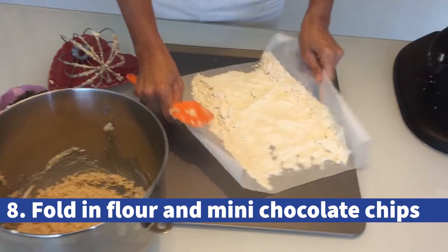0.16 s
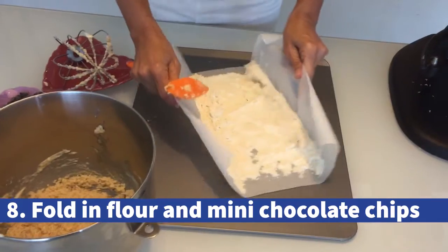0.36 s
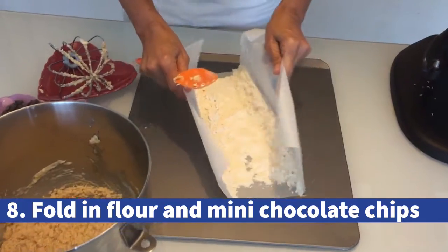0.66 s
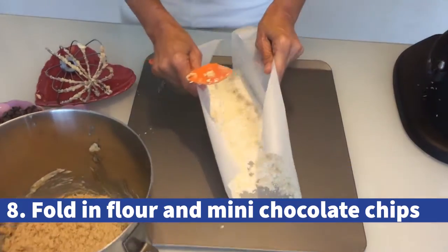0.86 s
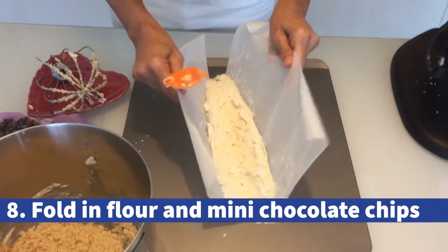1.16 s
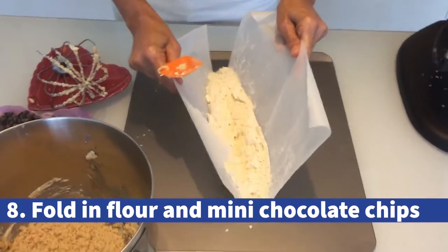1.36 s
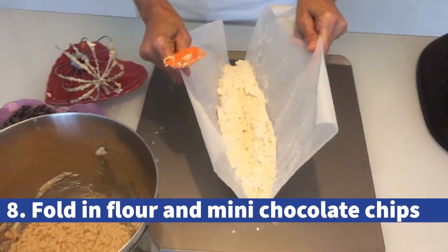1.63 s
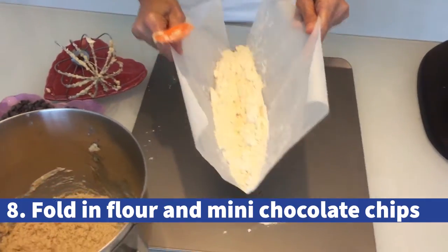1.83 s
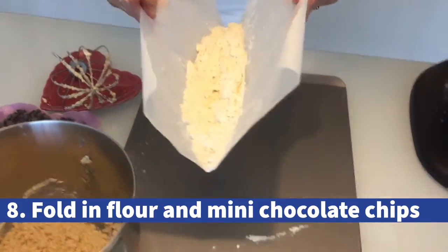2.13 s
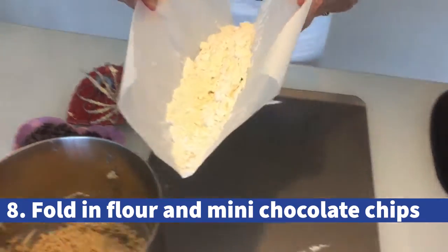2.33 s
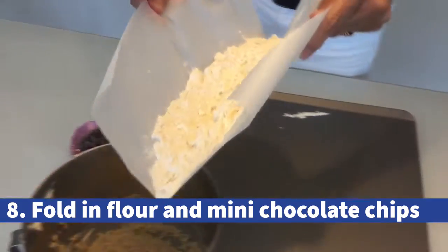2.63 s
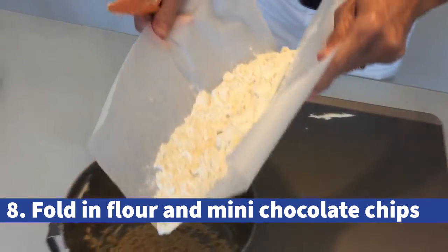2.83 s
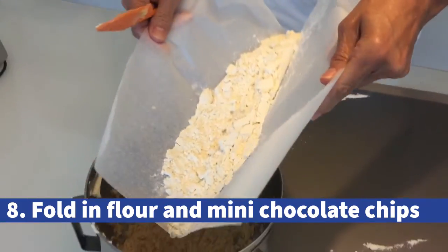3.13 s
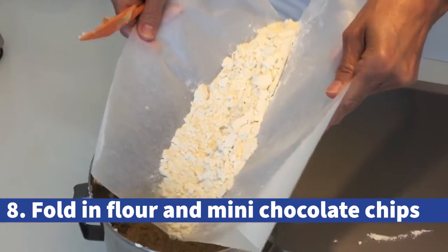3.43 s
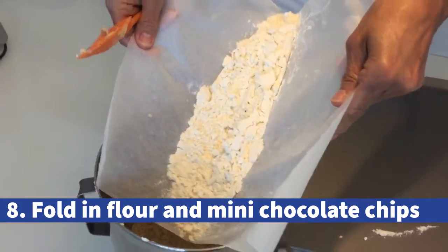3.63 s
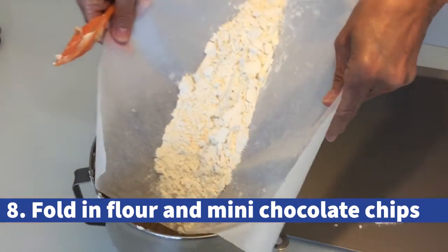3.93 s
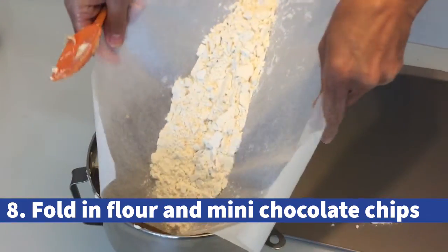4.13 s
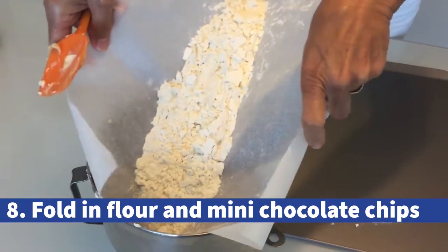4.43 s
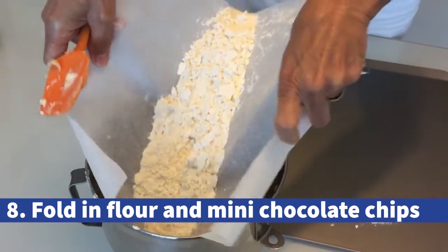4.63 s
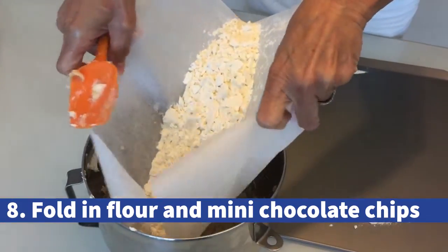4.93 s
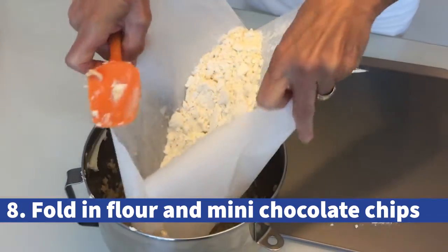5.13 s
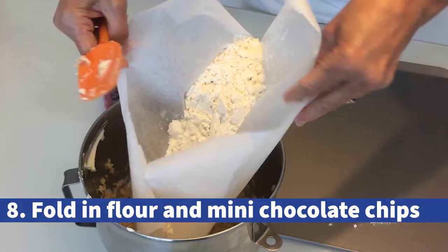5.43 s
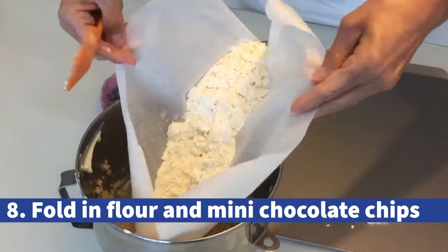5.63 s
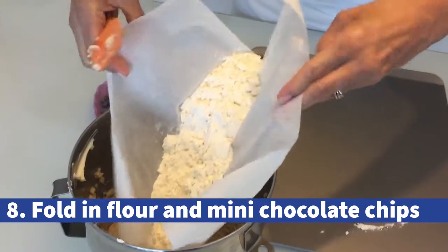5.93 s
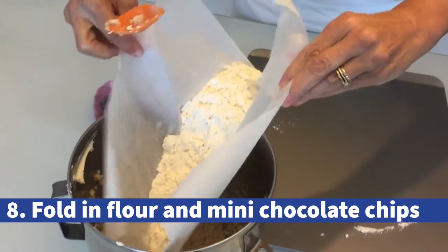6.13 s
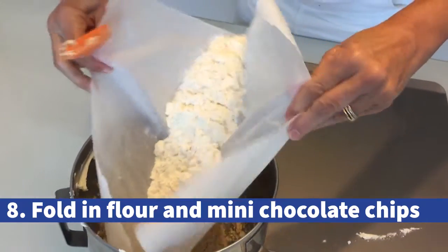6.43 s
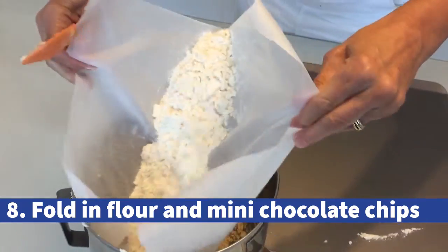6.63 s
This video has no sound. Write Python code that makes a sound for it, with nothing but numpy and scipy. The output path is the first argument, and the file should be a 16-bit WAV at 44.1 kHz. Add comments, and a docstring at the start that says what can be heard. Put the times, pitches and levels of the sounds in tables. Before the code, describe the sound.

Stiff parchment paper rustles, quiets to scattered ticks, then crackles harder in bright snapping bursts above a metal bowl in a softly humming kitchen.

```python
"""A sheet of baking parchment loaded with flour is dragged over a tray, in crackle and sliding hiss from noise
pops. It is lifted and tilted while its rustle crests again and again; creases snap singly and in runs, panels
flutter and folds collapse. As it comes over a steel mixing bowl, decaying air and wall modes colour the paper,
and it is folded into a chute. Throughout, a small kitchen answers with decaying noise, and an appliance hums in
wavering sines over still air."""
import sys
import numpy as np
from scipy import signal
from scipy.fft import rfft, irfft, next_fast_len
from scipy.io import wavfile
from scipy.ndimage import uniform_filter1d, map_coordinates

SR = 44100
rng = np.random.default_rng(int(sys.argv[2]) if len(sys.argv) > 2 else 0)


def to_wav(s):
    """Save 16-bit WAV."""
    ch = np.atleast_2d(s).T  # columns
    pcm = np.round(np.clip(ch, -1, 1) * 32767)  # PCM
    wavfile.write(sys.argv[1], SR, pcm.astype(np.int16))


N = 298689

# how the paper moves: (time [s], share of smooth sliding against crackle [0-1])
SLIDING_SHARE = [(.3, 0.7), (.6, 0.3), (2.8, 0.68), (3.4, .1), (4.1, .1), (5.5, .76), (5.8, 0.32),
                 (6.3, 0.35), (6.5, 0.66), (6.77, 0)]


def amp(db):
    """Decibels to gain."""
    return 10 ** (np.asarray(db) / 20)


def unit(x):
    """Scale to rms 1."""
    return x / np.sqrt(np.mean(x ** 2) + 1e-20)


def fade(t, t60):
    """Exponential decay by 60 dB in t60 seconds."""
    return 1000 ** (-t / t60)


def along(points, hz):
    """Read (frequency, value) points on a log frequency axis."""
    f, values = np.transpose(points)
    return np.interp(np.log(hz + 1), np.log(f), values)


def curves(rows):
    """One value per sample for each column after the time."""
    times, *columns = np.transpose(rows)
    return [np.interp(np.arange(N) / SR, times, column) for column in columns]


def wobble(rate):
    """A smooth random curve with rate knots a second."""
    knots = rng.standard_normal(int(N * rate / SR) + 4)
    return map_coordinates(knots, [np.arange(N) * rate / SR])


def filtered(x, response):
    """Multiply the spectrum of x by a response of frequency."""
    size = next_fast_len(N + SR // 2)
    hz = np.fft.rfftfreq(size, 1 / SR)
    return irfft(rfft(x, size) * response(hz), size)[:N]


def coloured(x, spectrum, size=4096):
    """Causal filter with the given spectrum that keeps the power of white noise."""
    gain = unit(amp(along(spectrum, np.fft.rfftfreq(size, 1 / SR))))
    # folding the cepstrum forward makes the filter minimum phase
    cepstrum = irfft(np.log(gain + 1e-6))
    cepstrum[1:size // 2] *= 2
    cepstrum[size // 2 + 1:] = 0
    impulse = irfft(np.exp(rfft(cepstrum)))
    return signal.fftconvolve(x, impulse)[:N]


def shifting(x, response, size=6000):
    """Convolve with a response drawn anew every half window, as the sheet moves."""
    out, x = np.zeros(N + 2 * SR), np.pad(x, size // 2)
    window = np.sin(np.pi * np.arange(size) / size)
    for start in range(0, N, size // 2):
        piece = x[start:start + size]
        answer = signal.fftconvolve(piece * window[:len(piece)], response())
        out[start:][:len(answer)] += answer
    return out[size // 2:][:N]


def facet(t60, tilt_db, uneven_db, rise_s, crack=0.56, size=1024, count=24):
    """One facet of paper popping through: a sharp crack and a dying shiver, of energy 1 and its own colour."""
    t, hz = np.arange(size) / SR, np.fft.rfftfreq(size, 1 / SR)
    shiver = rng.standard_normal(size) * fade(t, t60) * (1 - np.exp(-(t / rise_s) ** 2))
    burst = shiver / np.linalg.norm(shiver)
    burst[size // 32] += crack * rng.choice([-1, 1])
    bump_places = np.linspace(0, np.sqrt(SR / 2), count)
    bumps = np.interp(np.sqrt(hz), bump_places, rng.standard_normal(count))
    octaves = np.log2(np.maximum(hz, 2000) / 2000)  # the tilt starts at 2 kHz
    pop = irfft(rfft(burst) * amp(uneven_db * bumps + tilt_db * octaves))
    return pop / np.linalg.norm(pop)


def crackle(rate, spread_db, t60, even_s, count=80):
    """Many small facets, rate a second, popping at random; slow swings are evened out and the rms is 1."""
    pops = np.zeros(N + SR)
    for _ in range(count):
        pop_t60 = t60 * np.exp(0.39 * rng.normal())
        pop = facet(pop_t60, rng.normal(0, 0.97), uneven_db=3, rise_s=0.00023)
        starts = rng.integers(0, N, int(rate * N / SR / count))
        sizes = amp(spread_db * np.clip(rng.standard_normal(len(starts)), -2, 2))
        places = (starts[:, None] + np.arange(len(pop))).ravel()
        pops += np.bincount(places, np.outer(sizes, pop).ravel(), N + SR)
    span = int(even_s * SR)
    power = np.abs(uniform_filter1d(uniform_filter1d(pops[:N] ** 2, span), span))
    return unit(pops[:N] / np.sqrt(power + 0.1 * power.mean()))


def background():
    """A hum of sines wavering in level and phase, over the filtered noise of still air."""
    # appliance hum: (frequency [Hz], rms level [dB], waver [dB])
    hum_tones = [(120, -65.5, 1), (134.7, -59, 4), (247.3, -66.5, 3), (45, -75.5, -7)]
    # still room: (frequency [Hz], relative level per Hz [dB])
    air_spectrum = [(20, -5), (40, -7), (65, -3), (100, 3.5), (160, 5.5), (200, -2.5), (300, -0.5),
                    (450, -12), (850, -9), (1300, -18), (2000, -22.5), (3000, -30.5), (6000, -37),
                    (16000, -47)]
    t = np.arange(N) / SR
    hum = np.zeros(N)
    for hz, db, waver_db in hum_tones:
        waver = amp(waver_db * wobble(14))
        tone = np.sin(2 * np.pi * hz * t + .5 * wobble(10))
        hum += amp(db) * unit(waver * tone)
    return hum + amp(-58.0) * coloured(rng.standard_normal(N), air_spectrum)


def movements():
    """Rustle level and weight in dB over time, for each long movement and each crest of the rustle."""
    # weight is the low flexing against the rustle
    # the loaded sheet is dragged over the tray: (time [s], rustle level [dB], weight [dB])
    drag = [(0, -39, -24), (0.11, -34, -20.5), (0.22, -35.5, -19), (0.3, -33, -16.5), (0.44, -39.5, -23.5),
            (0.6, -42.5, -21), (0.76, -36.5, -20), (0.83, -42, -29), (1.12, -40.5, -21), (1.2, -35, -29),
            (1.33, -31, -23.5), (1.43, -44.5, -19), (1.52, -68, -18)]
    # separate crests of the rustle while the sheet is lifted and tilted: # (crest time [s], rise [s], fall [s],
    # rustle level [dB], weight [dB])
    crests = [(1.655, 0.12, 0.054, -52, -14), (1.99, 0.022, 0.042, -50, -9.5),
              (2.08, 0.032, .025, -47, -6.5), (2.38, .05, .04, -52.5, -10), (2.785, 0.025, .03, -54, -15),
              (2.996, 0.045, 0.053, -36, -12.5), (3.09, 0.034, 0.061, -46, -16),
              (3.24, 0.062, .04, -55, -14), (3.33, 0.029, 0.068, -39.5, -13),
              (3.396, 0.045, 0.045, -31.5, -13.5), (3.49, 0.023, 0.023, -36, -9),
              (3.66, .09, 0.076, -37, -16), (3.779, 0.042, 0.029, -32, -13), (3.95, .07, 0.056, -36, -15),
              (4.094, 0.085, .05, -37.5, -11.5), (4.2, .08, .06, -49, -25),
              (4.286, 0.024, .018, -30.5, -9.5), (4.461, 0.062, 0.08, -34.5, -22),
              (4.57, 0.036, 0.042, -35.5, -6.5), (4.73, 0.3, 0.11, -39, -16),
              (4.869, 0.027, 0.015, -40, -15)]
    # the sheet is folded into a chute over the bowl: (time [s], rustle level [dB], weight [dB])
    fold = [(4.921, -49.5, -14.5), (5.11, -42, -31), (5.2, -34, -16), (5.35, -30, -20), (5.42, -36.5, -19),
            (5.509, -30.5, -20.5), (5.619, -36.5, -20.5), (5.798, -26, -19), (5.88, -40.5, -17.5),
            (5.97, -27, -14.5), (6.029, -35, -27.5), (6.139, -33, -18.5), (6.209, -27, -21),
            (6.301, -30.5, -21), (6.492, -23.5, -24.5), (6.63, -35.5, -24.5), (6.7, -30, -25.5),
            (6.77, -37.5, -14)]
    release_db_per_s = 250  # how fast a long movement comes and goes
    crest_shape = 1.53  # 1 = pointed crest, 2 = round
    t = np.arange(N) / SR
    for rows in (drag, fold):
        db, weight_db = curves(rows)
        outside_s = np.abs(t - np.clip(t, rows[0][0], rows[-1][0]))
        yield db - release_db_per_s * outside_s, weight_db
    for s, rise, fall, db, weight_db in crests:
        away = np.clip(np.maximum((s - t) / rise, (t - s) / fall), 0, 10)
        yield db - 20 / np.log(10) * away ** crest_shape, weight_db


def handling():
    """The movements together: their powers add, and their weights average by power."""
    power, weighted = 1e-20, 0
    for db, weight_db in movements():
        part = np.exp(db * np.log(10) / 10)
        power = power + part
        weighted = weighted + part * weight_db
    return 10 * np.log10(power), weighted / power


def sheet(level_db, weight_db):
    """Bending makes crackle, sliding a finely grained hiss; the more weight, the larger the radiating patches."""
    # radiation of small, middling and large patches: (frequency [Hz], relative level per Hz [dB])
    crisp_spectrum = [(1200, -39.5), (1900, -4), (2400, 3.5), (4000, 3.5), (6300, 2), (9000, 2),
                      (12000, 1.5), (15800, -7.5)]
    rustle_spectrum = [(700, -36), (1050, -11.5), (1220, -3.5), (1500, 0), (1900, 2), (2300, -1.5),
                       (3200, -11), (6000, -50.5)]
    flex_spectrum = [(90, -35), (170, -14), (240, -7), (500, -3.5), (570, -1.5), (720, 2), (790, -1.5),
                     (900, -1.5), (1300, -13.5), (2500, -41.5)]
    crisp_db, rustle_db, flex_db = -0.91, -3, -1.5
    rustle_weight = 0.37  # share of the weight that the middling patches follow
    share = np.clip(curves(SLIDING_SHARE)[0], 0, 1)
    bending = crackle(rate=360, spread_db=6.5, t60=0.0089, even_s=0.089)
    sliding = crackle(rate=2000, spread_db=3.0, t60=0.0024, even_s=0.09)
    drive = amp(level_db) * (np.sqrt(1 - share) * bending + np.sqrt(share) * sliding)
    crisp = coloured(drive * amp(crisp_db), crisp_spectrum)
    rustle = coloured(drive * amp(rustle_db + rustle_weight * weight_db), rustle_spectrum)
    flex = coloured(drive * amp(flex_db + weight_db), flex_spectrum)
    return crisp + rustle + flex


def kitchen(x, wet_db, early_db, early_t60):
    """Counter and cupboards answer with a short noise burst while a longer diffuse tail dies away."""
    # decay of the room: (frequency [Hz], t60 [s])
    room_decay = [(200, 0.31), (1000, 0.37), (4000, 0.36), (9000, 0.2), (16000, 0.15)]
    t = np.arange(SR // 3) / SR

    def response():
        hz, s, z = signal.stft(rng.standard_normal(len(t)), SR, nperseg=256)
        decaying = z * fade(s, along(room_decay, hz)[:, None])
        tail = signal.istft(decaying, SR, nperseg=256)[1][:len(t)]
        tail = tail * (1 - np.exp(-t / 0.0029))  # soft onset
        early = rng.standard_normal(len(t)) * (t > .001) * fade(t, early_t60)
        wet = amp(wet_db) * tail / np.linalg.norm(tail)
        return wet + amp(early_db) * early / np.linalg.norm(early)
    return shifting(x, response)


def strays(level_db):
    """Rows (time, level, brightness) of lesser creases giving way at random, sized by the rustle around them."""
    per_s, gain_db, spread_db = 30, 14, 2.5
    held_db = -64  # rustle that sizes them while the sheet just hangs
    sliding_db = -4.5  # smooth sliding weakens them by this much
    count = int(per_s * (N / SR - .1))
    chance = rng.standard_normal((count, 3))
    times = (np.arange(count) + 1 + chance[:, 0] / 2) / per_s
    times = np.clip(times, .02, N / SR - .02)
    size_db = np.maximum(level_db, held_db) + gain_db + sliding_db * curves(SLIDING_SHARE)[0]
    pop_db = size_db[(times * SR).astype(int)] + spread_db * chance[:, 1]
    brightness_hz = 5000 * np.exp(.5 * chance[:, 2])
    return list(zip(times, pop_db, brightness_hz))


def chains(rows, count=4):
    """A faint snap leads each one in; it sets off neighbours along the crease, on average weaker and sparser."""
    gap_s, slowing, loss_db = .0026, 1.6, 7.5
    lead_s, lead_db = .007, -19
    out = []
    for s, db, hz in rows:
        out.append((s - lead_s * np.exp(.4 * rng.normal()), db + lead_db, hz))
        out.append((s, db, hz))
        for k, (late, loud) in enumerate(rng.standard_normal((count, 2))):
            s = s + gap_s * slowing ** k * np.exp(.3 * late)
            out.append((s, db - loss_db * (k + 1) + 2 * loud, hz))
    return out


def snaps(rows):
    """Each crease creaks briefly, then lets go in one sharp pop whose spectrum tilts with its brightness."""
    # radiation of a snap: (frequency [Hz], relative level per Hz [dB])
    snap_spectrum = [(100, -38.5), (400, -14), (800, -15), (1200, -5.5), (2500, 0.5), (4000, 4),
                     (6300, 2.5), (9000, 3), (12500, 2.5), (16000, -4.5)]
    gain_db, ring_t60, tilt_per_octave_db = 8.5, 0.012, 2.5  # octaves of brightness
    out, lead_in = np.zeros(N + SR), SR // 80
    for s, db, hz in rows:
        tilt_db = tilt_per_octave_db * np.log2(hz / 5200)
        pop = facet(ring_t60, tilt_db, uneven_db=3.0, rise_s=0.00068, crack=0.35)
        # the reversed decay swells up to the pop
        creak = rng.standard_normal(lead_in) * fade(np.arange(lead_in)[::-1] / SR, 0.038)
        start = round(s * SR)
        out[start:][:len(pop)] += amp(db + gain_db) * pop
        out[start - lead_in:start] += amp(db - 31) * creak
    return coloured(out[:N], snap_spectrum)


def hollow_swells(width=0.32):
    """A short hollow flutter of band noise swells and dies: mostly panels of the sheet flipping through, where
    a lower centre stands for a larger panel; the first is a short swell in the opening rustle."""
    # hollow swells, mostly larger panels buckling, the first a swell in the opening rustle: (time [s], half
    # length [s], centre [Hz], level before gain [dB])
    swell_rows = [(.13, 0.04, 1500, -45), (0.635, 0.0025, 2540, -30.5), (1.082, .026, 2140, -45.5),
                  (1.818, .018, 2940, -66), (2.361, 0.0099, 3380, -45), (2.995, 0.02, 613, -49),
                  (3.371, .025, 630, -48), (3.677, 0.032, 550, -55.5), (4.566, 0.015, 2160, -37.5),
                  (5.088, 0.015, 2750, -42), (5.178, 0.046, 667, -52), (5.367, 0.023, 312, -49.5),
                  (5.489, 0.025, 690, -43.5), (6.35, 0.028, 237, -50.5), (6.499, 0.054, 1040, -38)]
    out, t = np.zeros(N + 2 * SR), np.arange(-SR // 4, SR // 4) / SR
    f = np.fft.rfftfreq(len(t), 1 / SR) + 1
    for s, half_s, hz, db in swell_rows:
        swell = np.exp(-(t / half_s) ** 2)
        band = np.exp(-(np.log2(f / hz) / width) ** 2)
        flutter = swell * irfft(rfft(rng.standard_normal(len(t))) * band, len(t))
        flutter *= np.linalg.norm(swell) / np.linalg.norm(flutter)
        out[SR + round((s + t[0]) * SR):][:len(t)] += amp(db + 2.5) * flutter
    return out[SR:SR + N]


def bowl(paper):
    """The paper's noise rings the bowl's modes, whose strengths vary at random as the sheet moves."""
    # nearness of the sheet to the bowl: (time [s], coupling [dB])
    over_bowl = [(0, -33), (2.5, -4), (3.2, -1.5), (4.8, -5), (5.4, 7), (6.77, 7)]
    # air and wall modes: (frequency [Hz], t60 [s], level [dB])
    bowl_modes = [(604, 0.048, -8), (699.5, 0.086, -8.5), (977, 0.052, 3), (1024, 0.035, 1),
                  (1077, 0.042, 0.5), (1225, 0.33, -19), (2710, 0.41, -18)]
    t = np.arange(SR // 3) / SR
    rings = []
    for hz, t60, db in bowl_modes:
        evening = 2 * np.log(1000) / (t60 * SR)  # about unit gain at resonance
        rings.append(amp(db) * evening * fade(t, t60) * np.cos(2 * np.pi * hz * t))
    rings = np.array(rings)

    def answer():
        return amp(rng.normal(0, 2.5, len(rings))) @ rings
    return shifting(paper * amp(curves(over_bowl)[0]), answer)


def crunches():
    """A fold gives way in a dense run of tiny snaps that swells to a crest and dies."""
    # collapsing folds: (crest time [s], rise [s], fall [s], level before gain [dB])
    folds = [(3.890, .0009, 0.0023, -24), (3.8976, 0.00075, .0014, -10), (4.295, 0.018, 0.0029, -17),
             (4.561, 0.0086, .0047, -23), (5.338, 0.0064, 0.016, -24.5), (5.808, 0.0018, .0068, -18),
             (5.913, 0.0036, 0.0047, -18), (5.95, .0012, 0.0084, -16.5), (5.987, 0.0024, 0.0044, -23),
             (6.341, 0.0024, 0.0036, -18)]
    # radiation of a collapsing fold: (frequency [Hz], relative level per Hz [dB])
    collapse_spectrum = [(100, -38), (400, -13), (800, -14.5), (1200, -8), (2500, 0.5), (4000, 3.5),
                         (6300, 2.5), (9000, 2), (12500, 0.5), (16000, -3)]
    t = np.arange(N) / SR
    swell = np.zeros(N)
    for s, rise, fall, db in folds:
        swell += amp(db) * np.exp(-np.maximum((s - t) / rise, (t - s) / fall))
    tiny_snaps = crackle(rate=3500, spread_db=0, t60=0.0097, even_s=0.012)
    return coloured(swell * tiny_snaps, collapse_spectrum) * amp(-1.0)


def scene():
    """Paper, bowl and room, heard from one point."""
    # the most prominent creases snapping: (time [s], level before gain [dB], brightness [Hz])
    main_snaps = [(0.0837, -14, 4240), (0.2688, -13.5, 1910), (0.2984, -14.5, 9250), (0.6345, -13, 2460),
                  (0.6619, -13.5, 8770), (0.9016, -18.5, 6610), (1.1564, -22, 4180), (1.2039, -13.5, 3860),
                  (1.5643, -19.5, 9200), (1.6194, -18, 9940), (1.6519, -21, 4130), (1.6568, -24.5, 2570),
                  (1.948, -37, 5730), (1.9723, -19, 5640), (2.005, -23.5, 3030), (2.0436, -20.5, 8200),
                  (2.0692, -22, 9420), (2.0886, -22, 8380), (2.275, -29, 6930), (2.318, -31, 2700),
                  (2.3562, -22.5, 11700), (2.3634, -25.5, 3350), (2.4014, -23, 3370), (2.7739, -20.5, 6500),
                  (2.836, -29.5, 6780), (2.9129, -20, 5950), (2.9387, -15.5, 8040), (2.99, -14, 7090),
                  (3.0759, -18, 7400), (3.1061, -17, 2310), (3.2226, -23.5, 6000), (3.276, -18.5, 11500),
                  (3.3074, -17.5, 1640), (3.3279, -13, 3270), (3.3617, -16, 2310), (3.4028, -10.5, 11400),
                  (3.481, -12, 3860), (3.5528, -16.5, 2950), (3.5753, -15.5, 3060), (3.602, -15.5, 5520),
                  (3.616, -11.5, 6510), (3.7512, -17.5, 1900), (3.8153, -12.5, 1670), (3.8362, -11, 12100),
                  (3.8423, -8, 6200), (3.9709, -10.5, 5800), (4.0417, -16, 3200), (4.069, -14, 3170),
                  (4.0906, -9.5, 4020), (4.1056, -17, 3660), (4.136, -13, 5500), (4.1636, -16.5, 8720),
                  (4.374, -12.5, 9300), (4.7261, -15.5, 8630), (4.7709, -12.5, 6600), (4.8666, -14.5, 8490),
                  (4.9757, -16.5, 8200), (5.3903, -15, 3130), (5.4527, -10.5, 11200), (5.8072, -7, 11200),
                  (5.8449, -11, 2750), (5.914, -6.5, 13400), (5.9469, -2.5, 12700), (6.0255, -15.5, 3680),
                  (6.1389, -11.5, 8700), (6.2085, -7.5, 6420), (6.336, -3, 9820), (6.3428, -2.5, 9390),
                  (6.392, -14, 3690), (6.4633, -9.5, 2770), (6.7128, -8.5, 5340), (6.7553, -11.5, 5970)]
    level_db, weight_db = handling()
    paper = sheet(level_db, weight_db)
    paper = paper + snaps(strays(level_db)) + snaps(chains(main_snaps)) + crunches()
    paper = paper + bowl(paper) + hollow_swells()
    room = kitchen(paper, wet_db=-11.3, early_db=-9.5, early_t60=0.019)
    return (paper + room + background())[None]


def record(dry):
    """The microphone colours the sound and keeps nothing above its band limit."""
    # microphone colour, with two narrow dips: (frequency [Hz], level [dB])
    mic_colour = [(4300, 1), (4900, -1.5), (5500, 2), (9600, 1.5), (10500, -2), (11400, 1)]
    top_hz = 16050

    def response(hz):
        return amp(along(mic_colour, hz)) * (hz < top_hz)
    return filtered(dry[0], response)[None]


dry = scene()
out = record(dry)
to_wav(out)
```